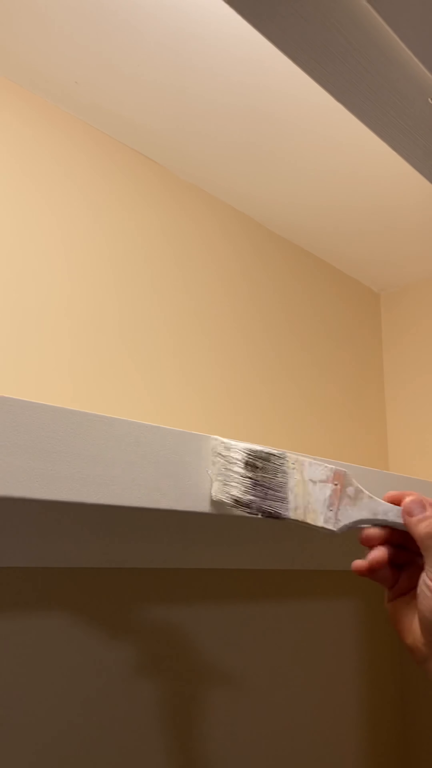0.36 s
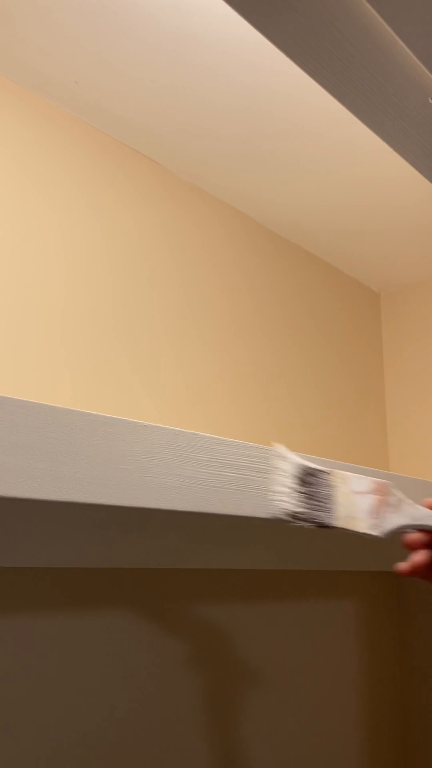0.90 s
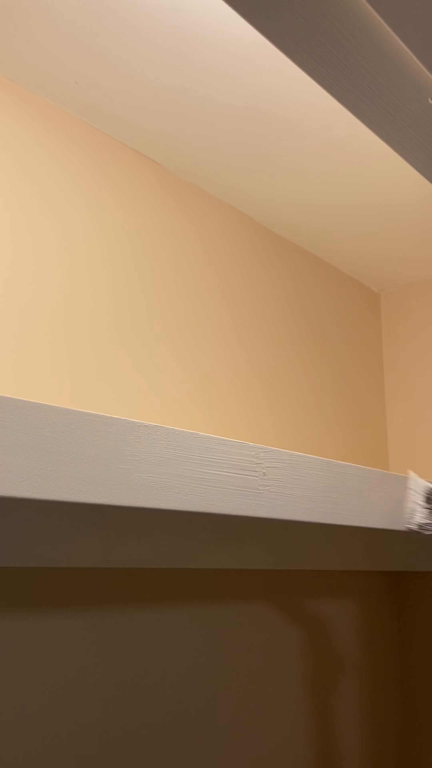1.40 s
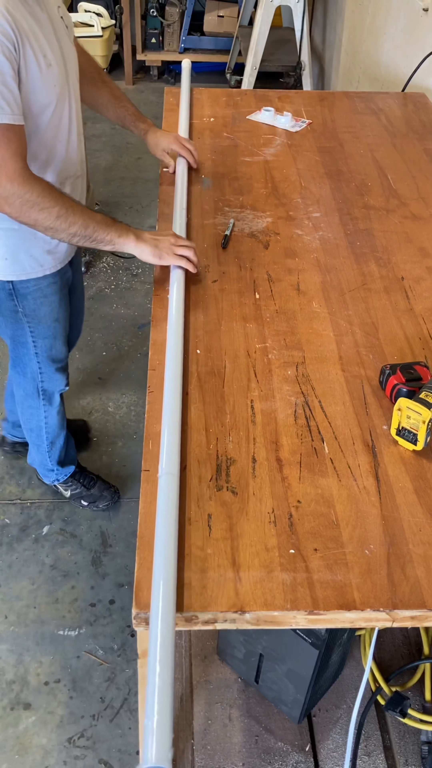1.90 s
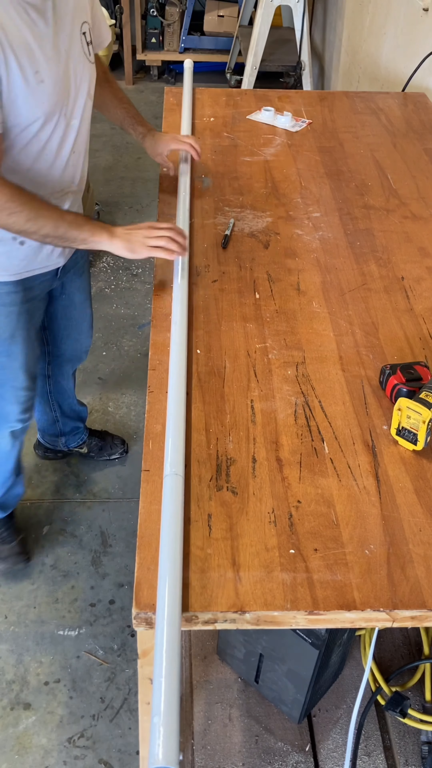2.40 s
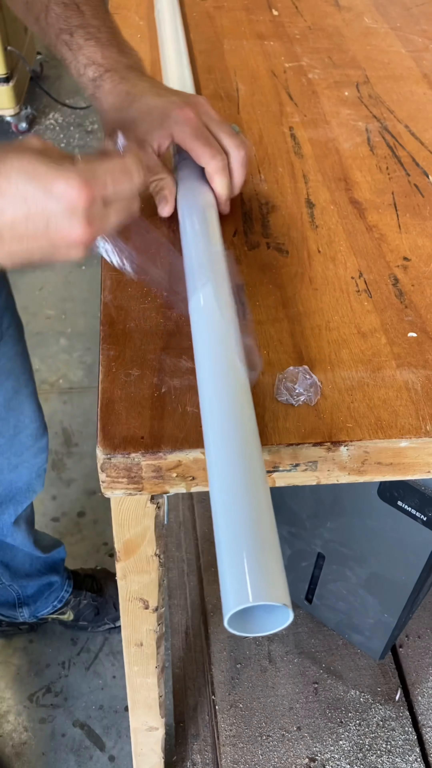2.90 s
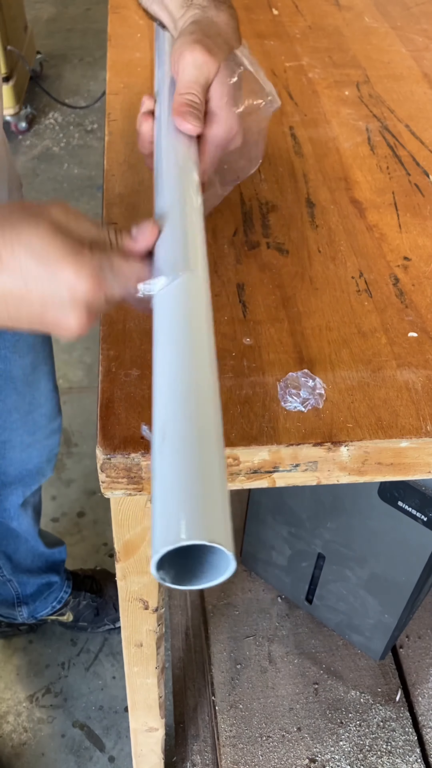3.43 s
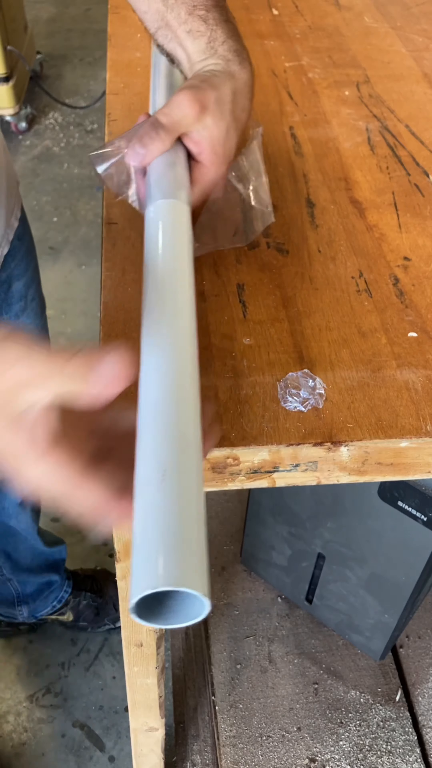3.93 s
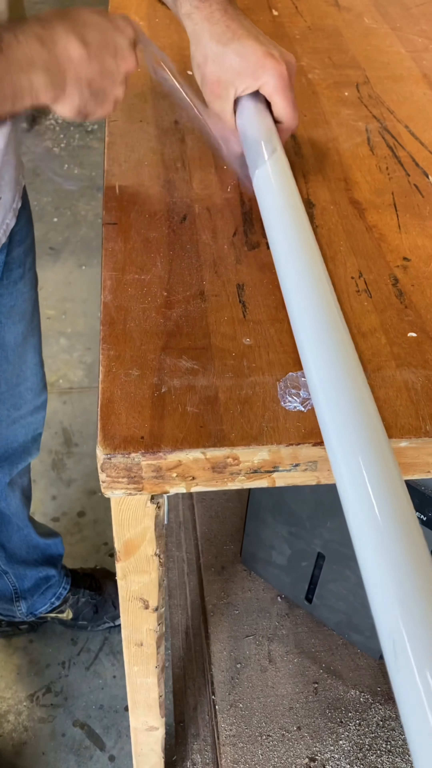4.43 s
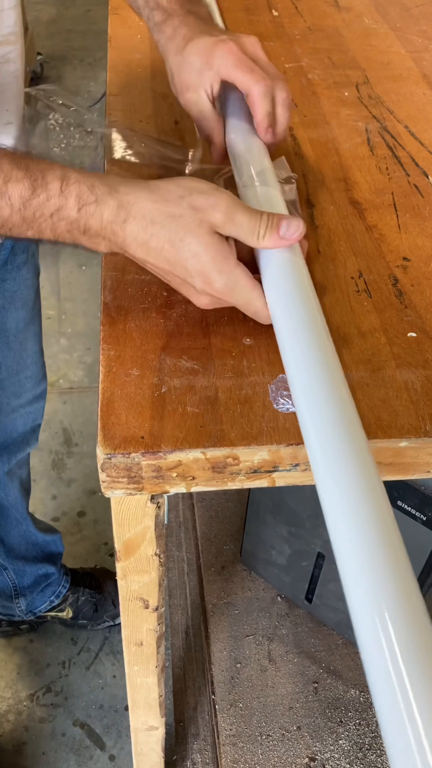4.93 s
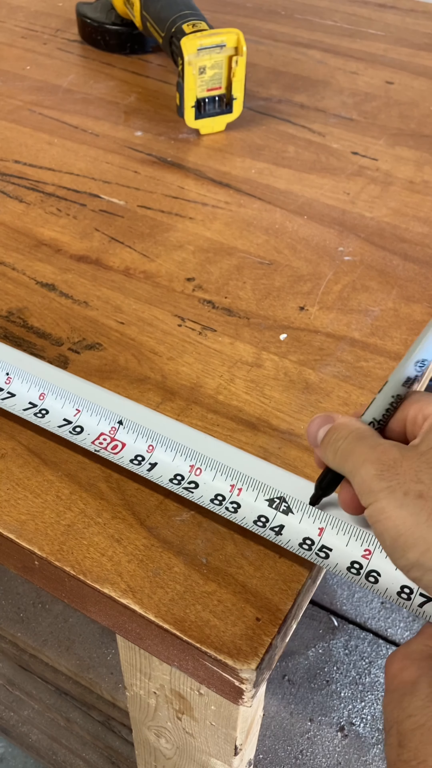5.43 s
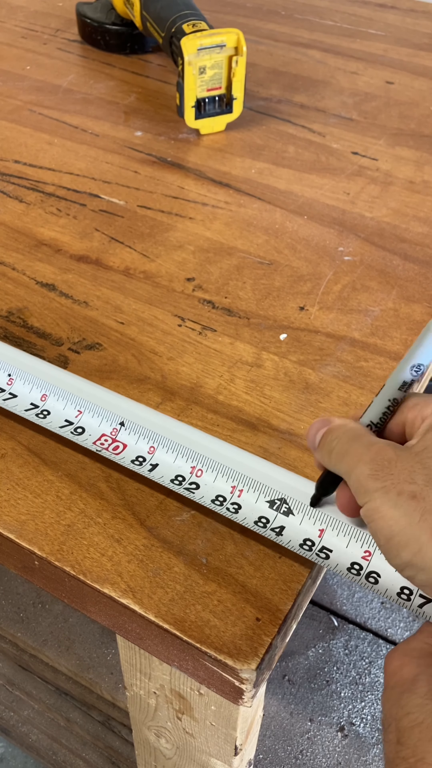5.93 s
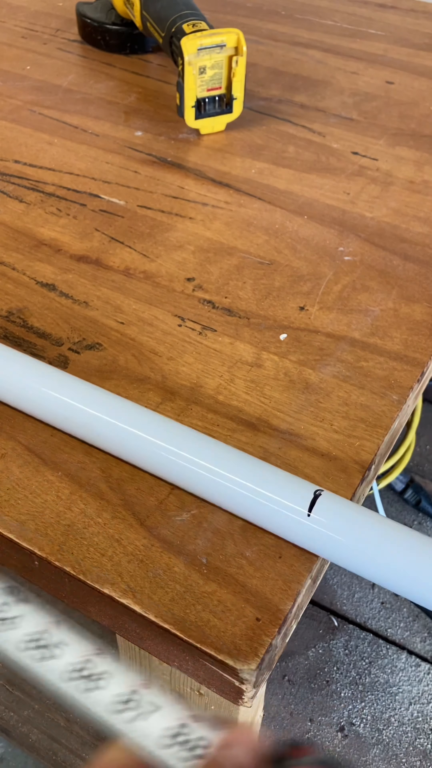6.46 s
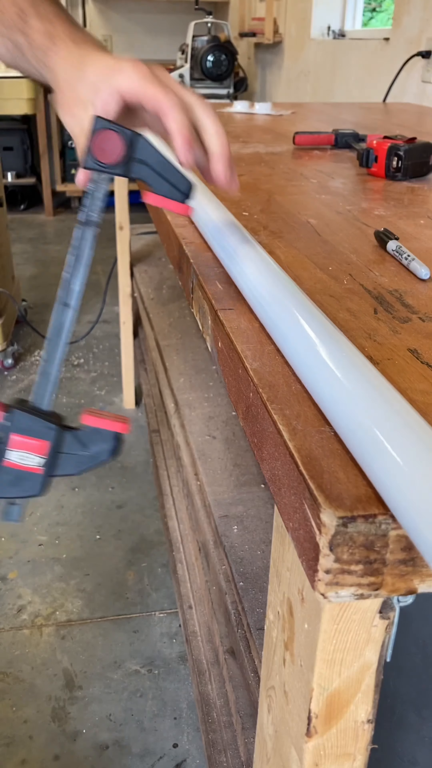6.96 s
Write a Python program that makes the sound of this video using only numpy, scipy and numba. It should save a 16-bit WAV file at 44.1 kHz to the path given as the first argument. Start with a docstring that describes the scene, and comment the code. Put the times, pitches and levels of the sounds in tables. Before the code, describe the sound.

Quiet, airy strokes of a hand on a hollow plastic tube come first. The background abruptly turns to a louder low rumble and drone, and the tube drops onto a wooden bench with a hard, ringing clack. Plastic film is then peeled and crumpled in bright crackling bursts. After a lull, a bar clamp clicks sharply amid dull wooden knocks. Close phone microphone in a small, lightly echoing workshop.

```python
"""A tube and plastic film on a workbench

Two scenes joined by a cut at 1.479 s; the second has a louder low outdoor rumble (noise) and drone (two tones).
A hand slides softly along a hollow tube: noise through the tube's air tones, plus hiss. The tube is knocked
and dropped on the wooden top: noise for the bench, fading tones for the tube. Plastic film is peeled and
crumpled as swarms of tiny noise snaps, a bar clamp clicks in noise ticks, and dull knocks sound in the wood.
The phone that hears it all limits loud peaks."""
import sys
import numpy as np
from scipy import signal
from scipy.fft import rfft, irfft, next_fast_len
from scipy.io import wavfile
from scipy.ndimage import uniform_filter1d
from numba import njit

SR = 44100
rng = np.random.default_rng(int(sys.argv[2]) if len(sys.argv) > 2 else 0)


def unload_wav(signal):
    """Save mono or channel-first audio to the path in sys.argv[1] as 16-bit WAV at rate SR, clipped to [-1, 1]."""
    wavfile.write(
        sys.argv[1],
        SR,
        np.round(np.clip(np.atleast_2d(signal).T, -1, 1) * 32767).astype(np.int16),
    )


def nominal_scale(level):
    """Amplitude ratio for a level in decibels (scalar or array-like)."""
    x = np.asarray(level, float) / 20
    return 10 ** x


N = 312228
T = np.arange(N) / SR  # time in seconds
OPPOSITE = np.array([[1], [-1]])  # one signal, upside down in the right port

# How sources in front of the phone reach its two ports.
# Each row: frequency in Hz, how far the left port leads in radians.
FRONT_LEAD = [(0, 0), (1400, -.5), (2100, .1), (6500, 1.0), (8000, 1.5), (10000, 3.0), (13100, 4.2),
              (16000, 6.0)]


def curve(table):
    """Columns of a table as straight lines over time; the first column is seconds."""
    s, *columns = np.transpose(table)
    return [np.interp(T, s, c) for c in columns]


def unit(x):
    """Scale to an rms (average strength) of 1."""
    return x / np.sqrt(np.mean(x ** 2))


def colour(x, points):
    """Filter of unit energy with the shape of (Hz, dB) points, looking only at the past, by way of the cepstrum."""
    hz, db = np.transpose(points)
    bins = np.arange(1025) * SR / 2048
    log_gain = np.interp(np.log(bins + 1), np.log(hz), db) * np.log(10) / 20
    cep = irfft(log_gain)
    # fold the second half onto the first, so the filter acts as early as it can
    cep[1:1024] *= 2
    cep[1025:] = 0
    taps = irfft(np.exp(rfft(cep)))
    return signal.oaconvolve(x, taps / np.sqrt(np.sum(taps ** 2)))[:len(x)]


def band(x, lo_hz, hi_hz):
    """Butterworth band-pass: keeps what lies between two frequencies."""
    sos = signal.butter(2, [lo_hz, min(hi_hz, .48 * SR)], "bandpass", fs=SR, output="sos")
    return signal.sosfilt(sos, x)


def walk(rate):
    """Random levels, rate of them a second, joined by straight lines; spread a little under 1."""
    k = int(SR / rate)
    return uniform_filter1d(np.repeat(rng.standard_normal(N // k + 1), k), k)[:N]


def burst(s, db, t60):
    """A noise burst that starts hard, falls 60 dB in t60 seconds and ends after 0.2 s at the latest."""
    i, t, out = int(s * SR), T[:SR // 5], np.zeros(N)
    fade = nominal_scale(db - 60 * t / max(t60, .001))
    out[i:i + len(t)] = (fade * rng.standard_normal(len(t)))[:N - i]
    return out


def tap(s, db):
    """One clean impulse: a single sample."""
    return nominal_scale(db) * (np.arange(N) == int(s * SR))


def strokes(start, length, end_db, swell_db, rise_db_s, fall_db_s):
    """Gain of gestures that set in fast, swell to their final level and fall away; powers add."""
    power = np.zeros(N)
    for s, hold, db, swell in zip(start, np.maximum(length, .001), end_db, swell_db):
        span = slice(max(int((s - .1) * SR), 0), int((s + hold + 1) * SR))
        t = T[span] - s
        level_db = db - swell * (1 - np.clip(t / hold, 0, 1))
        level_db += rise_db_s * np.minimum(t, 0) - fall_db_s * np.maximum(t - hold, 0)
        power[span] += nominal_scale(2 * level_db)
    return np.sqrt(power)


def ports(x, lead, pan_db):
    """Two microphone ports hear a source with a phase shift set by pitch; pan is one dB value or (Hz, dB) points."""
    hz, rad = np.transpose(lead)
    size = next_fast_len(N)
    bins = np.arange(size // 2 + 1) * SR / size
    turn = np.exp(.5j * np.interp(bins, hz, rad))
    pan_db = np.interp(bins, *np.transpose(pan_db)) if np.ndim(pan_db) else pan_db
    gain = nominal_scale(np.array([[.5], [-.5]]) * pan_db)
    return irfft(rfft(x, size) * gain * [turn, 1 / turn], size)[:, :N]


def rumble_outside():
    """Noise rumble with a wandering level and a rough drone, nearly the same in both ports; the cut changes both."""
    # Colour of the rumble. Each row: frequency in Hz, relative level in dB.
    rumble = [(18, -72), (30, -26), (106, -6.5), (134, -2), (245, -13), (295, -17), (702, -21),
              (1220, -28.5), (1540, -33), (2010, -32), (8080, -41.5), (10800, -41), (16000, -48.5)]
    # Drone after the cut.
    # Each row: time in seconds, pitch in Hz, level in dB, level of the second partial in dB.
    drone_path = [(1.48, 95, -51, -83.5), (2.4, 99.02, -49, -85.5), (3.0, 99.76, -58.5, -70),
                  (3.7, 103, -60.5, -60), (4.2, 106.5, -55.5, -53.5), (4.9, 112.6, -72.5, -60.5),
                  (6.5, 120, -60.5, -66.5), (7.08, 124.3, -50.5, -61)]
    cut_s, first_scene_db, second_scene_db = 1.479, -76.5, -55  # levels of the rumble
    first_drone_hz, first_drone_db = 127, -73  # drone before the cut

    after = T > cut_s
    hz, first_db, second_db = curve(drone_path)
    hz = np.where(after, hz, first_drone_hz)
    first_db = np.where(after, first_db, first_drone_db)
    rough = 2 * np.pi * np.cumsum(hz * (1 + 0.11 * walk(41))) / SR
    calm = 2 * np.pi * np.cumsum(hz * (1 + 0.01 * walk(33))) / SR
    drone = nominal_scale(first_db + 2.4 * walk(27)) * np.sin(rough)
    drone = drone + after * nominal_scale(second_db + 2.5 * walk(35)) * np.sin(2 * calm)

    mid, side, treble = (colour(rng.standard_normal(N), rumble) for _ in range(3))
    side = band(side, 700, 8000) + 0.24 * side
    noise = ports(mid, FRONT_LEAD, -0.8) + 0.76 * band(treble, 7000, 16000) + side * OPPOSITE
    sway = nominal_scale(np.where(after, second_scene_db, first_scene_db) + 2.3 * walk(5.0))
    return sway * noise + drone


def rub_tube():
    """Skin friction wakes the air modes of the tube, with a fine hiss above; part of it arrives diffuse."""
    # Air modes. Each row: frequency in Hz, width in Hz, relative level in dB.
    air_modes = [(677, 130, -8.5), (865, 280, -14.5), (1742, 190, -14), (2150, 250, -15)]
    # Colour of the hiss. Each row: frequency in Hz, relative level in dB.
    hiss_colour = [(2000, -34.5), (3000, -3), (5000, -1.5), (8500, -5.5), (11000, -2.5), (14500, 2.5),
                   (16000, -2.5)]
    # Strokes of the hand. Each row: start in seconds, length in seconds, final body level in dB,
    # swell of the body in dB, final hiss level in dB.
    hand_strokes = [(0.0, 0.12, -69.5, 22, -59), (0.427, .085, -73, 14, -64), (0.584, 0.077, -76, 6, -63),
                    (0.645, 0.087, -66.5, 22, -56), (0.831, 0.19, -55, 37, -55.5),
                    (1.123, 0.097, -62, 4.5, -57.5), (1.293, 0.11, -66.5, 16, -59),
                    (1.405, 0.061, -68.5, 0, -60), (1.5, .29, -92, 14, -67), (1.548, 0.014, -89, 9, -63)]
    rise_db_s, fall_db_s = 700, 547
    hiss_swell = 0.5  # share of the body's swell

    s, hold, body_db, swell_db, hiss_db = np.transpose(hand_strokes)
    # two separate noises: one direct, one diffuse
    noise = rng.standard_normal((2, N)) * nominal_scale(1.4 * walk(60.35))
    body = sum(nominal_scale(db) * unit(band(noise, hz - w / 2, hz + w / 2)) for hz, w, db in air_modes)
    body = unit(body) + 0.95 * unit(band(noise, 400, 3000))
    body = strokes(s, hold, body_db, swell_db, rise_db_s, fall_db_s) * body
    hiss = np.array([colour(part, hiss_colour) for part in noise])
    hiss = strokes(s, hold, hiss_db, hiss_swell * swell_db, rise_db_s, fall_db_s) * hiss
    diffuse = 1.03 * body[1] + 0.94 * band(hiss[1], 2200, 6400)
    return ports(body[0] + hiss[0], FRONT_LEAD, 0.084) + 0.29 * hiss[1] + diffuse * OPPOSITE


def knock_wood():
    """Each dull knock swells for a moment in one broad wooden resonance."""
    # Dull wooden knocks; the loud one at 1.787 s is the tube meeting the bench.
    # Each row: time in seconds, starting level in dB before filter and gain, rough pitch in Hz,
    # time to fall 60 dB in seconds.
    wooden_knocks = [(0.11, -58, 650, 0.075), (0.571, -58, 666, 0.053), (1.787, -8.5, 463, 0.1),
                     (2.622, -46.5, 467, 0.1), (3.128, -34.5, 241, 0.13), (3.509, -44, 920, 0.14),
                     (4.611, -44, 975, 0.11), (5.892, -38.5, 208, 0.17), (6.222, -44, 635, 0.11),
                     (6.247, -39.5, 630, 0.12), (6.369, -28.5, 258, 0.16), (6.428, -37, 525, 0.34),
                     (6.457, -34.5, 270, 0.17), (6.744, -44.5, 443, 0.16)]
    wood = 0
    for s, db, hz, t60 in wooden_knocks:
        knock = band(burst(s, db, t60), hz * 0.67, hz * 1.21)
        wood = wood + nominal_scale(14.5) * band(knock, hz * .7, hz * 1.5)
    return wood


def ring(x, modes):
    """Sum of tones, silent until first struck; each wavers randomly in level as it fades."""
    waver_db = 2.5
    first = np.flatnonzero(x)[0]
    t = T[:SR]
    shape = 0
    for hz, db, t60 in modes:
        level_db = db - 60 * t / t60 + waver_db * walk(22)[:SR]
        shape = shape + nominal_scale(level_db) * np.sin(2 * np.pi * hz * t)
    return np.pad(signal.oaconvolve(x[first:], shape)[:N - first], (first, 0))


def drop_tube():
    """Each blow, softened by its contact time, booms in the bench and rings the tube; a bright crack is added."""
    # Tube meets bench. Each row: time in seconds, force in dB before softening, contact time in ms,
    # time for the rattle to fall 60 dB in seconds, push into the tube in dB, crack level in dB before filtering.
    blows = [(1.785, -11, 2.9, 0.2, -31, -57), (1.8322, -3.5, 0.086, 0.056, -16, -27.5),
             (1.838, -3, 0.22, 0.17, -42.5, -27.5), (1.875, -14.5, 0.12, 0.028, -49, -40)]
    # Tones of the tube: pitches in Hz.
    tube_hz = [207, 280, 328, 486, 571, 642, 958, 1277, 1411, 1731, 1792, 1976, 2090, 2415, 2859, 3332,
               3833, 4360, 4899, 5510, 6089, 6686]
    # For each of those tones, a row: relative level in dB, time to fall 60 dB in seconds.
    tube_fade = [(-11, 0.89), (-0.5, 0.59), (-8, 0.79), (-1, 0.45), (2.5, 0.46), (3.5, 0.4), (-14.5, 1.1),
                 (-2, 0.29), (-29, 0.52), (-10.5, 0.22), (-14.5, 0.1), (-9.5, 0.27), (-2.5, 0.51),
                 (-7, 0.41), (-3, 0.52), (-6, 0.52), (-6, 0.54), (-1, 0.35), (-6, 0.33), (-16, 0.52),
                 (-15, .36), (-14, .33)]
    # Colour of the bench. Each row: frequency in Hz, relative level in dB.
    bench = [(50, -45.5), (90, -31), (170, -1.5), (350, -2), (520, -2), (860, -10), (2200, -5),
             (3000, -16.5), (4000, -22.5), (5200, -24.5), (7300, -13.5), (9000, -14), (12000, -24.5),
             (16000, -28)]

    rattle, push, crack = 0, 0, 0
    uneven = nominal_scale(3.5 * walk(180))
    for s, db, contact_ms, t60, ring_db, crack_db in blows:
        # a longer contact passes less treble
        soft = np.exp(-1000 / (max(contact_ms, .02) * SR) * 2 * np.pi)
        rattle = rattle + signal.lfilter([1 - soft], [1, -soft], burst(s, db, t60) * uneven)
        push = push + signal.lfilter([1 - soft], [1, -soft], tap(s, ring_db))
        crack = crack + burst(s, crack_db, .02)
    boom = colour(rattle, bench) + band(crack, 8000, 16000)
    return boom, ring(push, np.column_stack([tube_hz, tube_fade]))


def crumple_film():
    """Creases buckle as tiny noise snaps of uneven size, in swarms, over a sliding hiss."""
    # Pulls and crumples. Each row: start in seconds, length in seconds, final sizzle level in dB,
    # swell in dB, body level in dB relative to the sizzle.
    pulls = [(2.52, 0.033, -61.5, 1.5, 14.5), (2.648, 0.047, -24.5, 11, -2.5),
             (2.719, 0.076, -25.5, 6.5, 6), (2.811, 0.049, -29, 0, 5), (2.868, 0.07, -29.5, -2, 6),
             (2.972, 0.036, -35.5, 8, 1), (3.065, 0.043, -43.5, 10, 5.5), (3.161, 0.03, -38, -5.5, -1),
             (3.307, 0.054, -50.5, -8.5, 5), (3.374, 0.098, -30.5, 7.5, 3), (3.506, 0.022, -24, -1, 3),
             (3.73, 0.024, -51.5, -3, -10), (3.987, 0.058, -37, 17, 4.5), (4.148, .11, -26.5, 8.5, 6.5),
             (4.268, 0.052, -28, 0.5, 3.5), (4.342, .065, -27, -3.5, 1.5), (4.52, .075, -32, 15, 4.5),
             (4.612, .085, -31.5, -2, 4.5), (4.772, 0.03, -44, -4.5, 6), (4.828, 0.032, -42, 0, 2.5),
             (4.932, .06, -62, -6.5, 7.5), (5.854, 0.07, -68.5, -2, 8), (6.171, .12, -58, 0.5, 6),
             (6.311, 0.024, -45, 0.5, 4.5), (6.367, 0.17, -50, -1, 15.5), (6.57, 0.123, -57.5, 0, 12),
             (6.7, 0.033, -50.5, -1.5, 6.5), (6.74, .125, -46.5, 0, -12)]
    # The clearest single snaps. Each row: time in seconds, starting level in dB before colouring,
    # body in dB relative to that.
    snaps = [(2.6416, -27.5, 2), (2.656, -13.5, -7), (2.6734, -9, -36), (2.679, -12.5, -18),
             (2.6948, -6, -28), (2.699, -4, -25), (2.7097, -14.5, -18), (2.7255, -14, -10),
             (2.7327, -17.5, -13), (2.752, -14, -17), (2.762, -9, -1), (2.7914, -8, -11), (2.8738, -10, 6),
             (3.006, -22, -6), (3.0454, -23, -29), (3.0722, -28, -15), (3.1581, -16.5, -10.5),
             (3.2738, -46, -17), (3.306, -30, -10), (3.3887, -35, 0), (3.415, -14.5, -7),
             (3.439, -12.5, 1.5), (3.4766, -9.5, -3), (3.5104, -17, 10), (3.7323, -24, -24.5),
             (3.8214, -33, -4), (3.945, -40.5, 0.5), (4.0806, -31.5, 11), (4.1496, -23, -10),
             (4.245, -15, -28), (4.317, -12, -8), (4.337, -22, -6), (4.524, -25.5, -14), (4.5793, -12, 3),
             (4.6142, -13, -7.5), (4.623, -11, -10), (4.7, -21, -3), (5.1382, -38, -2), (5.2497, -36, 4.5),
             (6.068, -38, -1.5), (6.2043, -32, -8)]
    # Colour of the film. Each row: frequency in Hz, relative level in dB.
    film_colour = [(150, -67.5), (250, -11.5), (436, -19.5), (788, -10), (1240, -13.5), (1530, -9.5),
                   (3650, -5.5), (7700, -4), (10400, 6), (14900, 6.5), (16000, -0.5)]
    rise_db_s, fall_db_s = 2500, 807
    # let go, the film rustles on more softly and a little duller
    settle_db, settle_fall_db_s, settle_body_db = -15.5, 88, 6
    snap_t60_s, patchy_db = .005, 2.2

    s, hold, db, swell_db, body_db = np.transpose(pulls)

    def worked(level_db, after_db):
        """Gain of the pulls and of the softer rustle after each."""
        pull = strokes(s, hold, level_db, swell_db, rise_db_s, fall_db_s)
        rustle = strokes(s + hold, 0 * s, level_db + after_db, 0 * s, rise_db_s, settle_fall_db_s)
        return np.hypot(pull, rustle)

    swarm = nominal_scale(2.2 * walk(120) + 1.0 * walk(25))
    chance = rng.random((2, N))
    size_db = np.minimum(-4.2 * np.log(chance[1] + 1e-9), 16)
    grains = (chance[0] < 1500 / SR) * nominal_scale(size_db)  # about 1500 a second
    fade = np.exp(-np.log(1000) / (0.0035 * SR))  # each falls 60 dB in 3.5 ms
    crackle = signal.lfilter([1], [1, -fade], grains) * rng.standard_normal(N)
    even = swarm * (unit(crackle) + 1.08 * rng.standard_normal(N))

    # the colour shifts as the sheet changes shape: each band wanders on its own
    edges = 100 * 1.7 ** np.arange(11)
    bed = 0
    for k in range(10):
        bed = bed + (-1) ** k * nominal_scale(patchy_db * walk(30)) * band(even, *edges[k:k + 2])
    bed = unit(bed)
    sizzle = bed * worked(db, settle_db)
    body = bed * worked(db + body_db, settle_db + settle_body_db)
    for at, peak_db, rel_db in snaps:
        snap = burst(at, peak_db, snap_t60_s)
        sizzle, body = sizzle + snap, body + nominal_scale(rel_db) * snap
    # below 8500 Hz the body level takes over from the sizzle
    lows = signal.sosfiltfilt(signal.butter(2, 8500, fs=SR, output="sos"), body - sizzle)
    return colour(sizzle + lows, film_colour)


def click_clamp():
    """Hard ticks jangle the bright steel of the clamp; its plastic grip answers lower."""
    # Trigger and pawl. Each row: time in seconds, starting level in dB before filters and gains,
    # time for the jangle to fall 60 dB in seconds, push into the grip in dB relative to the steel.
    trigger_ticks = [(6.3575, -13, 0.12, -16.5), (6.4223, -26.5, 0.31, -1.5), (6.4526, -21, 0.14, -5),
                     (6.4857, -33, 0.068, 1), (6.525, -39.5, 0.071, 5.5), (6.7114, -42.5, 0.091, -3),
                     (6.7394, -48, 0.085, 6), (6.909, -55, 0.092, -23), (6.976, -52, 0.084, -2.5)]
    # Colour of the steel. Each row: frequency in Hz, relative level in dB.
    steel_colour = [(710, -28), (1200, -24.5), (1460, -10.5), (2040, -30), (2230, -14), (5130, -2.5),
                    (5970, 6), (7660, -1), (12100, -8), (14000, -1), (16000, -10)]
    steel, grip = 0, 0
    for s, db, t60, grip_db in trigger_ticks:
        tick = burst(s, db, .04) + burst(s, db - 10, t60)
        steel, grip = steel + tick, grip + nominal_scale(grip_db) * tick
    answer = nominal_scale(6.5) * band(grip, 1700, 3180) + nominal_scale(4.5) * band(grip, 510, 1050)
    return nominal_scale(-2.0) * colour(steel, steel_colour) + answer


def room(x, alike_hz):
    """Diffuse tail, shorter in the treble: a part both ports share and a mid-band part that differs."""
    # Each row: frequency in Hz, time for the tail to fall 60 dB in seconds.
    room_fade = [(125, 0.62), (500, 0.49), (2000, 0.42), (8000, 0.3)]
    t = T[:SR // 2]
    tails = np.zeros((2, len(t)))
    for hz, t60 in room_fade:
        tails += band(rng.standard_normal(tails.shape), hz / 2, hz * 2) * nominal_scale(-60 * t / t60)
    tails[1] = band(tails[1], alike_hz, 7000)
    # starts 3 ms late and builds up over 11 ms
    tails *= np.clip((t - .003) / 0.011, 0, 1) / np.sqrt(np.sum(tails[0] ** 2))
    return [signal.oaconvolve(x, tail)[:N] for tail in tails]


def scene():
    """Near sources reach the ports directly and again through the room."""
    # How the blows on the bench reach the ports.
    # Each row: frequency in Hz, how far the left port leads in radians.
    bench_lead = [(60, -.3), (170, -1.6), (520, -.6), (1400, -.5), (2100, .9), (6000, 1.5), (7700, 3.0),
                  (9200, 3.3), (11400, 5.6), (15200, 7.7)]
    # Balance of the film. Each row: frequency in Hz, left minus right in dB.
    film_balance = [(60, 0), (110, -3), (200, -1.0), (380, -3), (700, -2.5), (1290, -6.5), (2380, -4.5),
                    (4400, -5), (8120, -1.5), (15000, 0.0)]

    background, rubbing, wood = rumble_outside(), rub_tube(), knock_wood()
    boom, tube = drop_tube()
    sheet, clicks = crumple_film(), click_clamp()

    far, far_side = room(nominal_scale(-2.5) * boom + nominal_scale(-16.0) * tube, 900)
    near, near_side = room(nominal_scale(-17) * sheet + nominal_scale(-11.5) * clicks + nominal_scale(-9.0) * wood, 830)
    side = (1.9 * far_side + 2.3 * near_side) * OPPOSITE

    dropped = ports(boom + tube + far, bench_lead, -2.0)
    handled = ports(sheet, FRONT_LEAD, film_balance) + ports(clicks, FRONT_LEAD, .1)
    return dropped + handled + wood + near + side + rubbing + background


@njit
def limit(peak, top, ratio, attack, release):
    """Gain that holds down a loud envelope; attack and release are the share of the gap closed per sample."""
    gain, e = np.ones(len(peak)), 0.
    for i in range(len(peak)):
        e += (peak[i] - e) * (attack if peak[i] > e else release)
        if e > top:
            gain[i] = (top / e) ** (1 - 1 / ratio)
    return gain


def low_pass(x):
    """Removes everything above the highest recorded frequency."""
    return signal.sosfilt(signal.butter(12, 17000, fs=SR, output="sos"), x)


def record(dry):
    """The phone cuts the deep bass, holds down loud peaks and cuts the top treble with two steep filters."""
    dry = signal.sosfilt(signal.butter(2, 50, "high", fs=SR, output="sos"), dry)
    peak = np.abs(dry).max(axis=0)
    held = dry * limit(peak, 0.48, 2.9, 0.21, 0.0023)
    held = signal.sosfilt(signal.ellip(8, .2, 36, 15900, fs=SR, output="sos"), held)
    held = signal.sosfilt(signal.ellip(8, .2, 60, 16900, fs=SR, output="sos"), held)
    return low_pass(held)


dry = scene()
out = record(dry)
unload_wav(out)
```